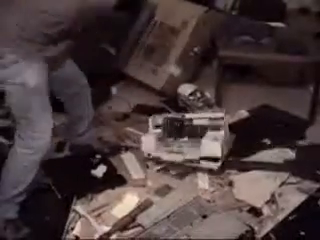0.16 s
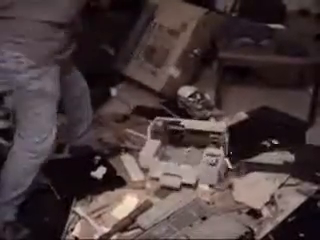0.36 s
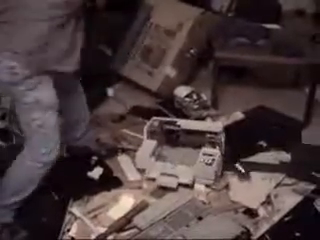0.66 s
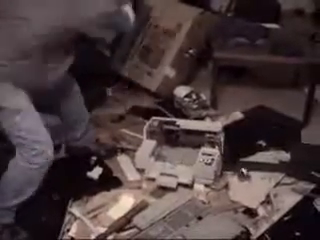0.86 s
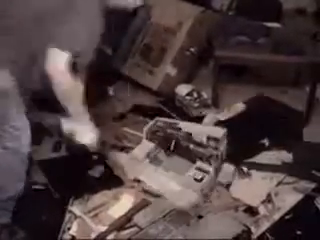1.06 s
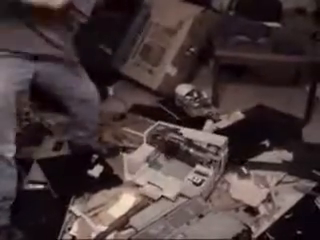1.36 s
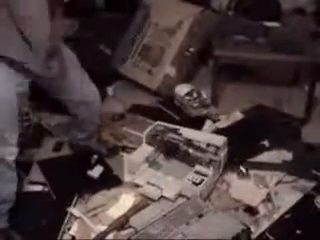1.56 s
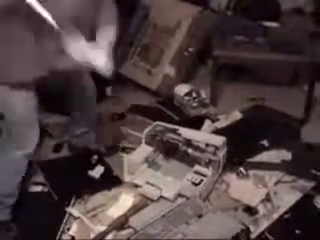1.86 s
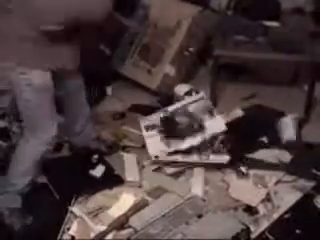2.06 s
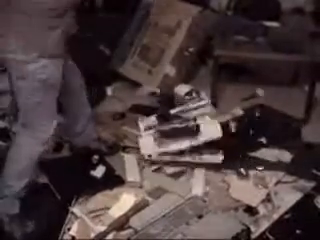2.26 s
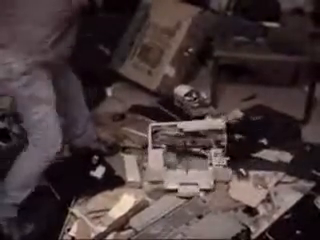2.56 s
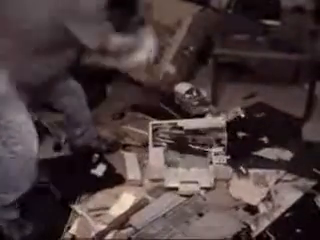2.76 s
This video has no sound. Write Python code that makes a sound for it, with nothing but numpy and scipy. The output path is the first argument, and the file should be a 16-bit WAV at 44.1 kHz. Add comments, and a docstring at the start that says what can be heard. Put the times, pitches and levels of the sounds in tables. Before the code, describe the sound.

Three hard bar strikes break a hollow plastic printer indoors. Each one thumps the floor, cracks sharply and sets off a dense rattle of fragments. Single pieces knock and land in between, with a brief echo and faint hiss.

```python
"""A small room with a littered floor, where a bar smashes a plastic printer three times.
The rattle of an earlier blow is dying at the start. Each blow is a thud of the floor and a sharp
crack, then a dense rattle: many tiny impacts ring the hollow casing and snap its shards.
Single parts knock and land in between. Blows and knocks echo briefly, over a faint hiss."""
import sys
import numpy as np
from scipy import signal
from scipy.io import wavfile

SR = 44100
rng = np.random.default_rng(int(sys.argv[2]) if len(sys.argv) > 2 else 0)


def materialize(psi):
    """Save the field psi as 16-bit PCM at rate SR to the path in sys.argv[1].

    A 1-D psi becomes a single channel; in a 2-D psi each row is a channel.
    """
    bounded = np.clip(np.atleast_2d(psi).T, -1, 1)
    quanta = np.round(bounded * 32767).astype(np.int16)
    wavfile.write(sys.argv[1], SR, quanta)


N = 127890


def gain_of(db):
    return 10 ** (np.asarray(db) / 20)


def unit_level(x):
    return x / np.sqrt(np.mean(x ** 2) + 1e-20)


def read_curve(points, hz):
    f, value = np.transpose(points)
    return np.interp(np.log(hz + 1), np.log(f + 1), value)


def add(mix, start_s, sound):
    part = mix[round(start_s * SR):][:len(sound)]
    part += sound[:len(part)]


def colour(x, points):
    """Turns pitches up or down along a curve of (f/Hz, level/dB) points."""
    log_gain = np.log(gain_of(read_curve(points, abs(np.fft.fftfreq(4096, 1 / SR)))))
    taps = np.fft.ifft(np.exp(np.conj(signal.hilbert(log_gain)))).real[:2048]
    return signal.oaconvolve(x, taps)[:len(x)]


def fade(t, t60):
    """Dies away by 60 dB in t60 seconds, the fade time."""
    return gain_of(-60 * t / max(t60, .004))


# Tone of the hiss: f/Hz, level/dB
HISS_TONE = [(30, -13.5), (125, -10), (330, -7.5), (500, -10), (1050, -10), (1840, -13.5), (4000, -17.5),
             (9000, -21.5), (13000, -23.5), (14400, -30), (15200, -85)]
def hiss():
    """Steady noise of the room and the electronics."""
    return gain_of(-54) * unit_level(colour(rng.standard_normal(N), HISS_TONE))


# How long the room rings: f/Hz, fade time/s
ROOM_FADES = [(100, 0.57), (300, 0.22), (1000, 0.29), (5000, 0.19), (15000, 0.065)]
def room_echo(x):
    """Sound bounces off the walls at random moments; high pitches die first."""
    slots = np.arange(150, SR // 2, 20)
    bounces = np.zeros(SR // 2 + 20)
    bounces[slots + rng.integers(0, 20, len(slots))] = rng.choice([-1., 1.], len(slots))
    hz, t, bands = signal.stft(bounces, SR, nperseg=256)
    fades = gain_of(-60 * t / read_curve(ROOM_FADES, hz)[:, None])
    tail = signal.istft(bands * fades, SR, nperseg=256)[1]
    return signal.fftconvolve(x, tail / np.linalg.norm(tail))[:N]


def floor_thud(t):
    """The floor answers a weight with three short, low tones."""
    return sum(np.sin(2 * np.pi * 69 * ratio * t) for ratio in (.9, 1.5, 2.4)) * fade(t, 0.032)


# Drops of the casing: t/s, level/dB
DROPS = [(.004, -38), (0.189, -53), (0.907, -40), (2.039, -45), (2.09, -43)]
def casing_drops():
    """The casing falls back on the floor with a soft thud."""
    out, t = np.zeros(N), np.arange(9000) / SR
    for start_s, db in DROPS:
        add(out, start_s, gain_of(db) * floor_thud(t))
    return out


# The casing's own tones: f/Hz, level/dB, fade time/s
CASING_TONES = [(265.3, -7.5, 0.057), (339, -4.5, 0.038), (446, -7, 0.079), (570.5, -4.5, 0.057),
                (620, -5.5, 0.038), (672, -7.5, 0.1), (765.4, -6.5, 0.072), (819, -11.5, 0.081),
                (878, -6, 0.046), (972, -3.5, 0.043), (1049, -9, 0.086), (1129, -3, 0.034),
                (1273, -6.5, 0.052), (1396, -7, 0.04)]
def casing_ring(t):
    """Struck at a random spot, the casing rings with a new mix of its tones, slightly detuned."""
    draws = rng.standard_normal((len(CASING_TONES), 2))
    return sum(share * gain_of(db) * fade(t, t60) * np.sin(2 * np.pi * hz * (1 + 0.02 * detune) * t)
               for (hz, db, t60), (share, detune) in zip(CASING_TONES, draws))


# What the panels pass to the air: f/Hz, level/dB
PANEL_TONE = [(60, -42), (150, -4.5), (230, -3), (16000, -7)]
def thin_panels(x):
    """Thin panels give off little bass."""
    return colour(x, PANEL_TONE)


# Tone of the shards: f/Hz, level/dB
SHARD_TONE = [(900, -31), (1500, -1), (2600, -2.5), (4200, -5), (8500, -11), (9800, -7.5), (16500, -6.5)]
def brittle(x):
    """Gives a sound the bright tone of breaking plastic."""
    return colour(x, SHARD_TONE)


def shard(t):
    """A shard makes a snap of noise and three short rings at random pitches."""
    pitches = np.exp(rng.uniform(np.log(1500), np.log(14000), size=3))
    rings = sum(np.sin(2 * np.pi * hz * t) for hz in pitches)
    return rng.standard_normal(len(t)) * fade(t, 0.08) + gain_of(-2) * rings * fade(t, 0.019)


# Loose parts: t/s, ring level/dB, f/Hz, ring fade time/s, casing jolt level/dB, snap level/dB
PART_KNOCKS = [(0.0468, -42, 3370, 0.016, -50, -34), (.083, -57, 2660, 0.018, -34.5, -31),
               (0.0941, -30, 8440, 0.017, -30, -31.5), (0.1305, -38, 3940, 0.15, -58, -35.5),
               (.163, -36, 2050, .05, -41, -35.5), (.2044, -39.5, 2200, 0.037, -53, -33),
               (0.2338, -37, 5500, 0.026, -57, -34), (0.2481, -35, 9250, 0.018, -62, -36),
               (.407, -42, 2620, 0.017, -64, -40.5), (0.51, -37, 10000, 0.021, -51, -35.5),
               (0.565, -54, 1557, 0.3, -52, -39.5), (.7345, -19, 2130, 0.022, -33, -27),
               (0.7762, -15.5, 820, 0.013, -37, -27), (.885, -27.5, 2130, 0.02, -29, -30),
               (.9639, -70.5, 7400, 0.024, -44, -27), (1.032, -46, 4460, 0.04, -66, -36.5),
               (1.097, -31, 2670, 0.015, -41, -32), (1.1114, -44, 8900, 0.013, -43, -37),
               (1.16, -10.5, 2400, 0.007, -30, -33.5), (1.1775, -35, 1410, 0.007, -50, -45),
               (1.239, -39, 6340, 0.012, -44.5, -39), (1.259, -32, 7660, 0.011, -52, -40),
               (1.3455, -38.5, 5370, 0.017, -48, -37.5), (1.3878, -41, 7000, 0.0096, -71, -47),
               (1.496, -43, 8900, 0.014, -51, -43.5), (1.5313, -53, 1160, 0.053, -57, -47),
               (1.5762, -41.5, 3030, 0.026, -67, -39), (1.6168, -47, 9100, 0.02, -45, -37.5),
               (1.6794, -18, 780, 0.017, -44, -23), (1.906, -29, 4920, 0.012, -53, -32),
               (1.913, -16, 2060, 0.01, -27, -38), (1.9695, -30, 7400, 0.014, -49, -37),
               (1.997, -38, 3100, .02, -28, -26.5), (2.0081, -30, 8840, 0.014, -24, -23.5),
               (2.054, -30, 9300, .02, -31, -36), (2.093, -38, 6560, 0.012, -26.5, -23.5),
               (2.131, -30.5, 8350, 0.022, -30.5, -23), (2.2324, -52, 6050, .015, -41, -27),
               (2.2707, -40, 5000, 0.0067, -27.5, -28.5), (2.302, -37, 8560, .02, -43, -37),
               (2.3581, -43, 3770, 0.031, -41.5, -36.5), (2.472, -29.5, 3700, 0.017, -36, -41),
               (2.5113, -34, 3450, 0.013, -50, -56), (2.738, -34, 3300, 0.014, -38, -24)]
def knocks():
    """Each part rings in a close cluster of tones, ticks, snaps and jolts the casing."""
    parts, jolts, t = np.zeros(N), np.zeros(N), np.arange(8000) / SR
    noises = unit_level(brittle(rng.standard_normal(len(PART_KNOCKS) * len(t)))).reshape(-1, len(t))
    ring_rise = (1 - np.exp(-t / 0.00075)) ** 2
    snap_rise = np.minimum(t / 0.0032, 1)
    snap_and_tick = snap_rise * fade(t, 0.042) + gain_of(2.5) * fade(t, 0.0051)
    for (start_s, ring_db, hz, t60, casing_db, snap_db), noise in zip(PART_KNOCKS, noises):
        detunes = rng.uniform([-2, -.1, 1], [-1, .1, 2]) * 0.00085 / max(t60, .008)
        side_share = min(.04 / max(t60, .004), 1)  # long rings are nearly one tone
        cluster = sum(share * np.sin(2 * np.pi * hz * (1 + detune) * t)
                      for detune, share in zip(detunes, (side_share, 1, side_share)))
        ring = cluster * ring_rise * fade(t, t60)
        add(parts, start_s, gain_of(ring_db) * ring + gain_of(snap_db) * noise * snap_and_tick)
        add(jolts, start_s, gain_of(casing_db) * unit_level(casing_ring(t)) / 4 * snap_rise)
    return parts + thin_panels(jolts)


def tilt_band(x, hz, db, octaves=0.64):
    """Turns the pitches near hz up or down against the rest."""
    return unit_level(colour(x, [(hz / 2 ** octaves, 0), (hz, db), (hz * 2 ** octaves, 0)]))


# One loudness curve per rattle: t/s, casing level/dB, shard level above the casing/dB
RATTLE_CURVES = [
    [(0, -27.5, -1), (.03, -36, -1), (.1, -39.5, -0.5), (.22, -41, -2.5), (.28, -51, 4), (.36, -49.5, -7),
     (.45, -63, 10)],
    [(.664, -29, 7.5), (.68, -24, 0), (.705, -19, -5), (.745, -27.5, 1.5), (.78, -27.5, -0.5),
     (.83, -30, -1), (.93, -35, -2.5), (1.0, -41.5, 0), (1.15, -50, 1), (1.19, -45, -4), (1.3, -72, 10)],
    [(1.652, -26, -0.5), (1.695, -29, 2.5), (1.715, -24.5, -0.5), (1.8, -33, 3), (1.885, -36, 0.5),
     (1.92, -30, -2), (1.955, -33.5, -3), (2.0, -37.5, 0), (2.065, -28.5, -3.5), (2.1, -30, -3),
     (2.145, -33, 2.5), (2.18, -37.5, 1.5), (2.257, -33.5, -7), (2.33, -41, -3), (2.43, -50, 1),
     (2.535, -51.5, 3)],
    [(2.543, -23.5, 2.5), (2.575, -25.5, 0.5), (2.62, -27, 3.5), (2.68, -32.5, 3.5), (2.74, -34, 2),
     (2.8, -39.5, 3), (2.9, -45.5, 4.5)],
]
# Each rattle's own tone: casing f/Hz, change/dB, shard f/Hz, change/dB
RATTLE_BANDS = [(746, 1.5, 2200, -3.5), (850, 5, 2100, 1.5), (820, 3.5, 1830, 3), (890, 3, 1670, 4.5)]
def rattle(impacts_per_s=1800, kinds=32):
    """A dense stream of small impacts, each ringing the casing and one shard."""
    sizes = gain_of(2 * np.minimum(rng.exponential(1, N), 4))
    impacts = sizes * (rng.random(N) < impacts_per_s / SR)
    kind, t = rng.integers(0, kinds, N), np.arange(3500) / SR
    casing, shards = np.zeros(N), np.zeros(N)
    for k in range(kinds):
        casing += signal.oaconvolve(impacts * (kind == k), casing_ring(t))[:N]
        shards += signal.oaconvolve(impacts * (kind == k), shard(t[:2500]))[:N]
    casing, shards = thin_panels(casing), brittle(shards)
    out, time = np.zeros(N), np.arange(N) / SR
    for curve, band in zip(RATTLE_CURVES, RATTLE_BANDS):
        times, casing_db, above_db = np.transpose(curve)
        onset = np.clip((time - times[0] + 0.0028) / 0.00099, 0, 1)
        tail_db = -300 * np.maximum(time - times[-1], 0)
        level = gain_of(np.interp(time, times, casing_db) + tail_db) * onset
        shard_share = gain_of(np.interp(time, times, above_db))
        out += level * (tilt_band(casing, *band[:2]) + shard_share * tilt_band(shards, *band[2:]))
    return out


# Blows of the bar: t/s, crack level/dB, thud level/dB, crack's treble lift/dB, punch level/dB
BAR_BLOWS = [(0.6628, -23, -30, 4, -7), (1.648, -21, -31.5, 10, -22), (2.5382, -22, -25.5, 11, -15)]
def bar_blows():
    """The bar punches the casing, the floor thuds, and the plastic cracks with a sharp first bite."""
    out, t = np.zeros(N), np.arange(9000) / SR
    punch = np.sin(2 * np.pi * 410 * t) * fade(t, 0.005)
    bite = gain_of(6) * fade(t, .012)
    crack_shape = np.minimum(t / .0013, 1) * (fade(t, 0.75) + bite)
    for start_s, crack_db, thud_db, lift_db, punch_db in BAR_BLOWS:
        noise = brittle(rng.standard_normal(len(t)))
        crack = unit_level(colour(noise, [(2000, 0), (6000, lift_db)])) * crack_shape
        weight = gain_of(thud_db) * floor_thud(t) + gain_of(punch_db) * punch
        add(out, start_s, weight + gain_of(crack_db) * crack)
    return out


# How well the microphone hears each pitch: f/Hz, level/dB
MICROPHONE_TONE = [(20, -19), (200, -2.5), (8800, 0.5), (10100, -8), (11000, -15), (11900, -10.5),
                   (13000, -3.5), (15500, -10.5), (16200, -28)]
def scene():
    """Mixes the hits, their echo, the rattle and the hiss into one channel."""
    hits = bar_blows() + casing_drops() + knocks()
    smashing = hits + rattle() + gain_of(-8.5) * room_echo(hits)
    return (colour(smashing, MICROPHONE_TONE) + hiss())[None]


def record(dry):
    """Gently squashes loud peaks, cuts pitches above 16 kHz and shifts the wave just below zero."""
    ceiling, offset = .27, -0.0041
    squashed = ceiling * np.tanh(dry / ceiling)
    treble_cut = signal.firwin(511, 16000, window=("kaiser", 9), fs=SR)
    return offset + signal.oaconvolve(squashed, treble_cut[None], "same")


dry = scene()
out = record(dry)
materialize(out)
```